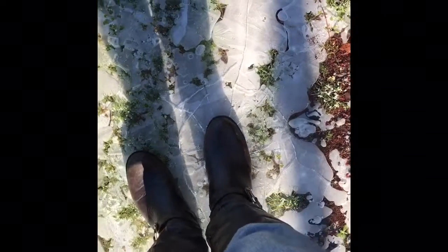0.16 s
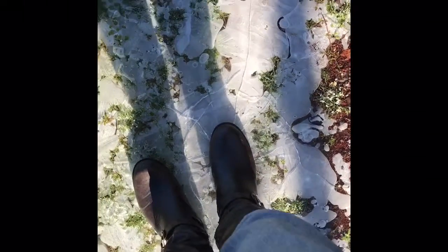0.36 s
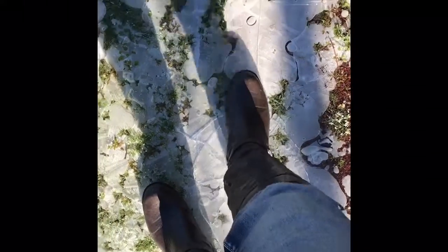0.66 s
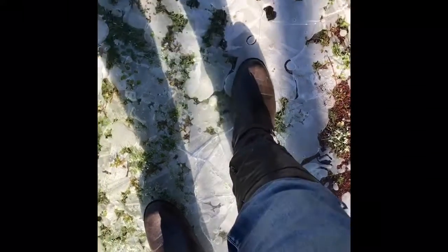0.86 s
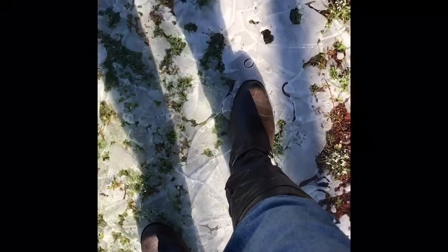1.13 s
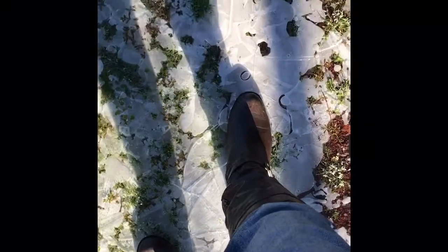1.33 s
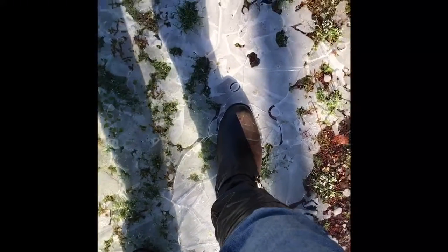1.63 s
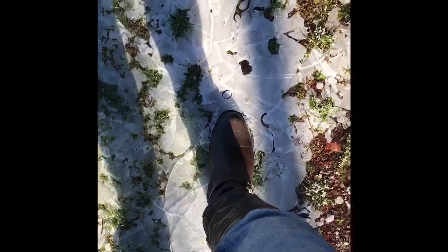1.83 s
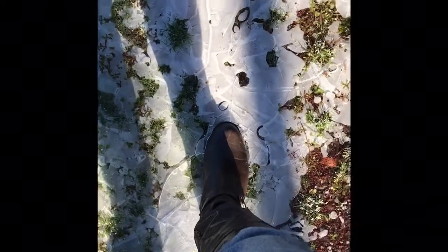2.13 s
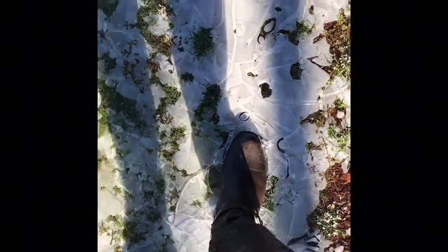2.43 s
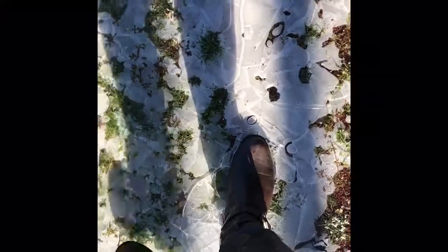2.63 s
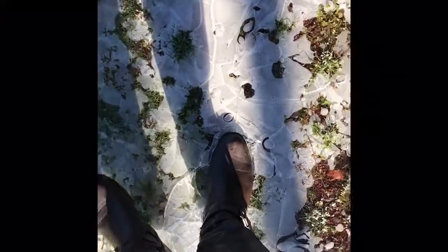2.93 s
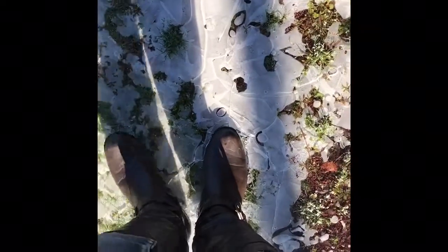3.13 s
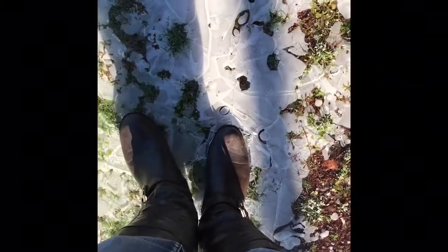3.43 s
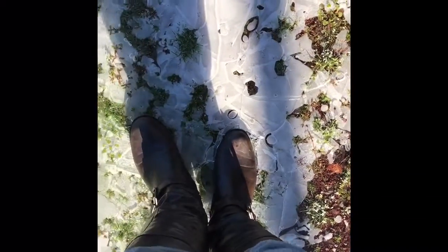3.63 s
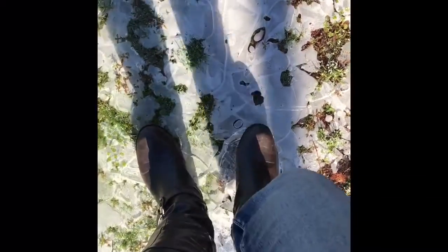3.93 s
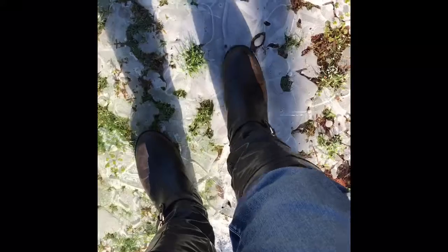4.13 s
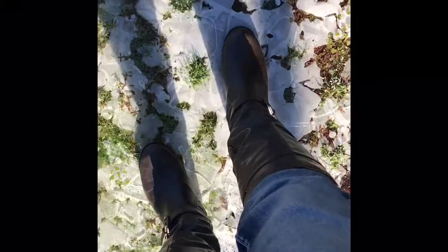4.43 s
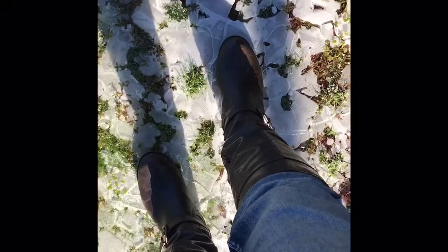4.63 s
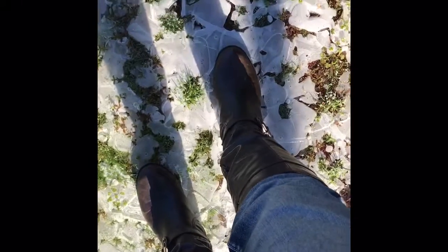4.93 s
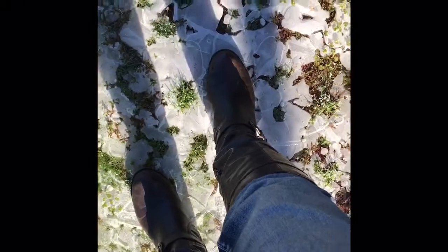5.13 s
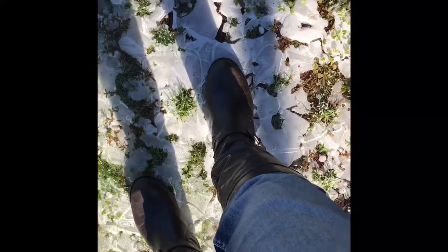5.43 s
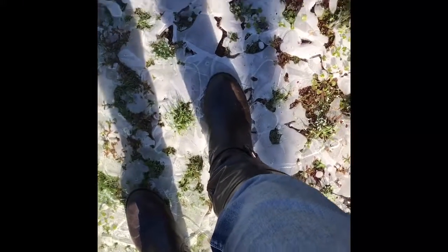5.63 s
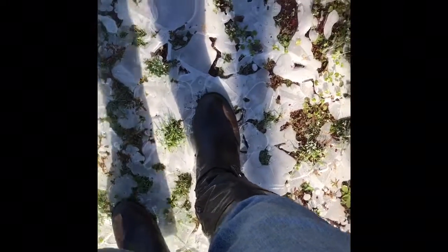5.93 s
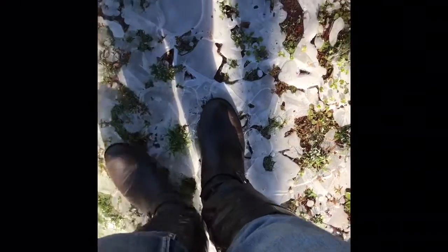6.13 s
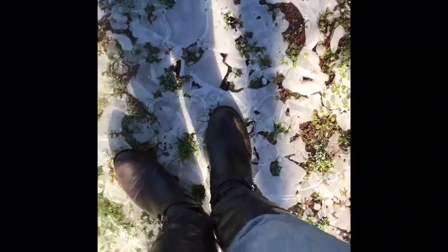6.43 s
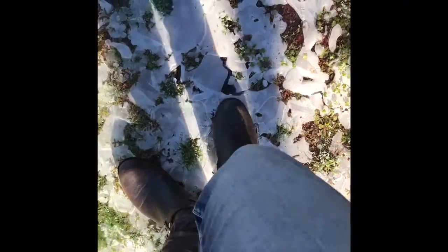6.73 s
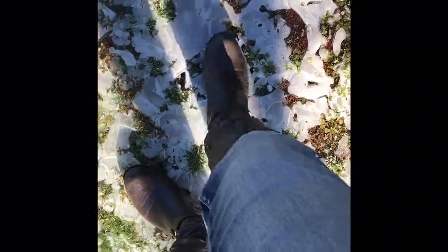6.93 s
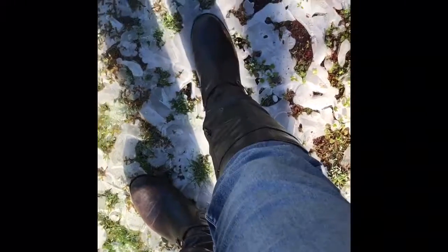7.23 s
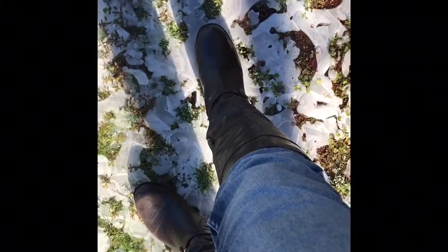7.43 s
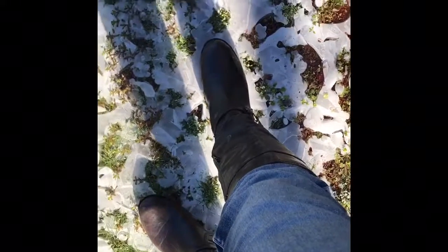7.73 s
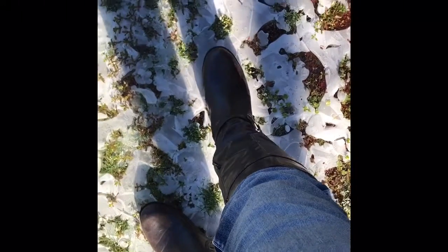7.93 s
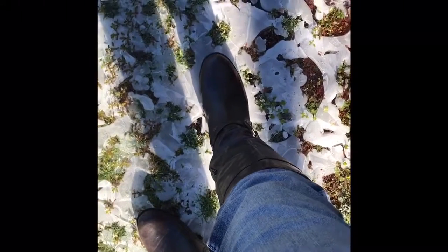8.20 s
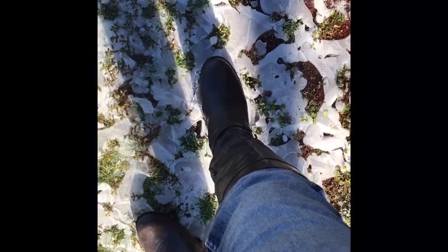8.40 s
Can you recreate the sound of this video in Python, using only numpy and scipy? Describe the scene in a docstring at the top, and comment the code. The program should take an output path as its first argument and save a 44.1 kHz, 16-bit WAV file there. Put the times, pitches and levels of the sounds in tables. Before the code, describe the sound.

Close underfoot, thin ice snaps, crackles and crunches under careful boot steps outdoors, pauses, resumes, then ends with creaking rubber and two hard cracks.

```python
"""A faint low rumble and a thin hiss hang in the open air throughout, made of shaped noise.
Rubber boots soon press on thin ice, hollow over frozen grass, close below the microphone: damped plate
modes snap singly and in short runs, tiny pings crunch and scuff, and trouser cloth brushes early on.
After a lull without cracks the ice snaps again, while trains of tiny jerks make the rubber creak.
Later come more creaks and a cluster of gliding squeaks, then two strong cracks close to the end."""
import sys
import numpy as np
from scipy import signal
from scipy.fft import rfft, irfft, next_fast_len
from scipy.io import wavfile
from scipy.ndimage import uniform_filter1d, map_coordinates

SR = 44100
rng = np.random.default_rng(int(sys.argv[2]) if len(sys.argv) > 2 else 0)


def wav_out(sig):
    """Save sig, one row per channel (or a flat mono array), as 16-bit PCM at SR to the path in sys.argv[1]."""
    wavfile.write(sys.argv[1], SR, np.round(np.clip(np.atleast_2d(sig).T, -1, 1) * 32767).astype(np.int16))


N = 377496  # samples
TOP_HZ = 16000  # nothing is heard above this

# Spectra of the far rumble and of the hiss in the air: (frequency [Hz], relative level [dB])
RUMBLE_SPECTRUM = [(20, -11), (35, -16.5), (55, 2), (85, 0), (190, -9), (280, -14.5), (500, -29),
                   (1100, -55.5)]
HISS_SPECTRUM = [(200, -43.5), (500, 15), (3000, -13), (8000, -4), (16000, -13.5)]

# Spectrum of brushing trouser cloth: (frequency [Hz], relative level [dB])
CLOTH_SPECTRUM = [(60, -27), (180, 10.5), (350, 4.5), (800, -7), (2000, -27), (6000, -68)]
# The trouser leg swings forward once
SWING_S, SWING_RISE_S, SWING_FALL_S, CLOTH_DB = 0.724, 0.35, 0.16, -40

# Rubber creaks as the boot flexes: (time [s], length [s], level [dB])
CREAKS = [(4.033, 0.067, -46.5), (4.077, 0.17, -55.5), (7.268, 0.035, -45.5), (7.319, 0.024, -36.5),
          (7.343, 0.076, -36.5), (7.532, 0.071, -41), (7.849, 0.078, -36), (7.992, 0.11, -41),
          (8.155, 0.019, -43.5)]
# Shaping of the creaks: (frequency [Hz], relative gain [dB])
CREAK_SHAPING = [(400, -20), (1100, -16.5), (1700, -4), (2700, -6), (4000, -8), (7000, -1), (14000, 0)]

# Rubber sticks and slips on ice: (time [s], length [s], start pitch [Hz], end pitch [Hz], level [dB])
SQUEAKS = [(7.562, 0.04, 964, 1140, -47.5), (7.577, 0.031, 1970, 2180, -44),
           (7.613, 0.043, 3140, 3580, -39), (7.656, 0.039, 3160, 4130, -37),
           (7.747, 0.048, 2870, 2800, -40.5), (7.781, 0.017, 1060, 1360, -41)]

# A sole loads or leaves the ice:
# (time of greatest pressure [s], rise [s], release [s], crunch drive [dB], scuff drive [dB])
PRESSES = [(.38, 0.36, 0.42, -36, -44.5), (.57, 0.13, 0.52, -45.5, -41), (0.991, 0.046, 0.2, -34.5, -66),
           (1.21, 0.09, 0.14, -29, -33), (1.85, 0.44, 0.29, -43.5, -44.5), (2.26, 0.35, 0.35, -36.5, -46.5),
           (2.498, 0.16, 0.17, -31, -36.5), (2.848, 0.18, 0.096, -37, -42.5),
           (3.79, 0.19, 0.094, -25.5, -28.5), (4.581, 0.22, 0.26, -26.5, -32.5),
           (4.84, 0.046, 0.21, -39, -36), (5.149, 0.31, 0.084, -40.5, -42), (5.78, 0.35, 0.48, -37, -38),
           (6.53, 0.15, 0.34, -32.5, -33.5), (7.63, 0.11, 0.17, -33, -54.5), (7.77, 0.11, 0.066, -42, -38),
           (8.06, 0.14, 0.035, -41.5, -45.5), (8.47, 0.071, 0.13, -38.5, -37.5)]
SWELL_RANGE_DB = 20  # gained over a rise, lost over a release or fall
REST_CRUNCH_DB, REST_SCUFF_DB = -59, -62  # drive under a standing boot
HALF_SPLINTERING_DB = -66.5  # crunch drive at which splinters reach half their share
# Shaping of crunch and scuff: (frequency [Hz], relative gain [dB])
CRUNCH_SHAPING = [(200, -32.5), (600, -16.5), (1700, -26.5), (3500, -9), (5000, -8), (7500, -4),
                  (16000, 0.5)]
SCUFF_SHAPING = [(120, -31.5), (400, -3.5), (1100, -2), (2600, 3.5), (5000, 7), (12000, -43.5)]

# Cracks of the ice; hollow sheets boom, thin edges click:
# (time [s], relative snap level [dB], hollowness = body over snap [dB], time scale of the run [ms])
CRACKS = [(0.2914, -33, -5.5, 0.36), (0.361, -36.5, -2, 0.94), (0.4064, -33.5, -22, 1.4),
          (0.4158, -19.5, -9.5, 0.83), (0.5266, -24, -5.5, 0.71), (0.7734, -33.5, -10, 1.3),
          (.8615, -22.5, -8, 1.1), (.9583, -30, -21.5, 0.84), (0.9694, -24.5, -15, 1.6),
          (1.0007, -33.5, -13, 1.1), (1.1213, -20.5, -13, 0.58), (1.1399, -16.5, -10, 4.7),
          (1.2027, -20, -16, 1.1), (1.215, -17, 1.5, 2.1), (1.2716, -28, -3.5, 1.3),
          (1.4297, -24.5, -9, 0.69), (1.4387, -24.5, -11, 0.97), (1.6508, -25, -19.5, 0.65),
          (1.7251, -24.5, 2.5, 1.9), (1.7836, -20, -1.5, 3.2), (1.825, -19, 2, 3.2), (1.8329, -22, -7, 5.8),
          (1.9039, -26.5, -15, .6), (1.9271, -21, -16, 1.5), (1.9574, -23.5, -1.5, 1.4),
          (1.9646, -26.5, -10.5, 0.89), (2.092, -33.5, -8, 1.2), (2.1595, -21.5, -15, 0.77),
          (2.1622, -17, -7.5, 1.5), (2.2561, -27, -8, 1.9), (2.331, -24.5, -12.5, 0.65),
          (2.346, -19.5, -9, .8), (2.4176, -31.5, -9.5, 1.3), (2.44, -15, 5.5, 3.3),
          (2.4553, -26.5, 12.5, 3.2), (2.47, -24, 4, 6.6), (2.4973, -30.5, 13, 13), (2.6073, -38, 2, 2),
          (2.7394, -32, -5, 1.1), (3.6956, -31.5, -18, 1), (3.7236, -26.5, -4, 0.89),
          (3.7855, -22.5, 3.5, 1.7), (3.8057, -33, 7, 3.7), (3.8472, -28.5, 6.5, 2), (4.16, -43, -20, .6),
          (4.2851, -35.5, 4, 3.3), (4.3223, -22.5, -2.5, 0.96), (4.3384, -22, -2, 1.5),
          (4.3439, -26.5, 2.5, 0.92), (4.392, -16, -6, 6.2), (4.4126, -23, -4, 1.4), (4.4468, -30, -5, 1.4),
          (4.4693, -25.5, 1, 3.2), (4.5078, -19.5, -8, 1.2), (4.541, -16.5, -9, 3.9),
          (4.5485, -18.5, 0, 3.5), (4.5841, -18.5, -4, 9.1), (4.6004, -22.5, 3.5, 2),
          (4.605, -14.5, -1, 2.4), (4.636, -25, 1.5, 2), (4.8043, -28.5, 10, 1.3), (4.812, -24, 3, 4.9),
          (4.8992, -32, -1.5, 1.9), (4.9222, -23, 1, 4.2), (5.0103, -26.5, -6, 1.3), (5.043, -21, -8, 1.4),
          (5.0571, -29.5, -5.5, 1.7), (5.15, -15.5, 7, 3), (5.5723, -20.5, -11, 0.9),
          (5.7376, -19, 1.5, 1.6), (5.7693, -20, 5.5, 2.4), (5.8081, -31, 7.5, 1.8),
          (5.8175, -17.5, 6.5, 2.2), (5.8873, -26, -4.5, 1.6), (5.917, -23, 3, 4.1),
          (6.0628, -32.5, 5.5, 1.5), (6.507, -26, -8.5, 3.5), (6.562, -28.5, -6.5, 7.9),
          (6.673, -29.5, 5.5, 2.1), (6.787, -28, -14, 0.38), (6.924, -40.5, -17.5, 1),
          (7.0355, -27, -10.5, .7), (7.2308, -28.5, -14, .7), (7.6373, -30.5, -10.5, 4.3),
          (7.676, -31, -6.5, 3.1), (7.7047, -23.5, -6, 2.2), (7.7227, -24.5, -4.5, 2),
          (8.099, -38.5, -7, 1.7), (8.2047, -27.5, -25, 0.34), (8.2246, -31.5, 1, .9),
          (8.2607, -38, -17.5, 1), (8.4434, -14.5, -14, 4.3), (8.451, -13.5, -1.5, 7.1)]
SPLINTER_DB, SPLINTER_LOSS = -0.5, 0.38  # bright edge over the snap [dB]; dB lost per dB of hollowness
PIECE_DB, PIECE_HZ = -27, 861  # relative level and centre pitch of the body of a typical piece
PITCH_HALVES_DB = 120.5  # a larger, louder piece rings lower: rise in body level per octave down


def amp(db):
    """Decibels to gain."""
    return 10 ** (np.asarray(db) / 20)


def unit(x):
    """Scale to rms 1."""
    return x / np.sqrt(np.mean(x ** 2) + 1e-20)


def add(track, s, sound):
    """Mix a sound into the track at time s."""
    start = round(s * SR)
    track[start:start + len(sound)] += sound[:max(N - start, 0)]


def band(x, lo_hz, hi_hz, order=2):
    """Causal band-pass."""
    edges = [lo_hz, min(hi_hz, 0.49 * SR)]
    return signal.sosfilt(signal.butter(order, edges, "band", fs=SR, output="sos"), x)


def coloured(x, points):
    """Shape x by (Hz, dB) points, at rms 1."""
    size = next_fast_len(N + 8192)
    hz, db = np.transpose(points)
    bins_hz = np.fft.rfftfreq(size, 1 / SR)
    gain = amp(np.interp(np.log(bins_hz + 1), np.log(hz), db))
    return unit(irfft(rfft(x, size) * gain, size)[:N])


def noise(points):
    """Noise of rms 1 with the given spectrum."""
    return coloured(rng.standard_normal(N), points)


def wobble(rate):
    """A smooth random curve, rate knots a second."""
    knots = rng.standard_normal(int(N * rate / SR) + 4)
    return map_coordinates(knots, [np.arange(N) * rate / SR])


def swell(s, rise, fall):
    """A gain that grows to 1 at time s and dies away, evenly in dB."""
    t = np.arange(N) / SR - s
    return amp(-SWELL_RANGE_DB * np.maximum(-t / rise, t / fall))


def grains(rate, spread_db, centre_hz, cycles, size=128):
    """Many tiny breaks, rate per second, each a damped ping of random pitch and strength."""
    count = int(rate * N / SR)
    draw = rng.random((count, 3))
    start = (draw[:, :1] * N).astype(int)
    # pitches lie within an octave either side of the centre
    hz = np.minimum(centre_hz * 2 ** (2 * draw[:, 1:2] - 1), SR / 2)
    strength = amp(spread_db * draw[:, 2:] ** 2)  # a positive spread gives many weak, few strong
    turns = hz * np.arange(size) / SR
    pings = strength * np.sin(2 * np.pi * turns) * np.exp(-turns / cycles)
    places = start + np.arange(size)
    return np.bincount(places.ravel(), pings.ravel(), N)[:N]


def fracture(t, run_ms, count=20):
    """A first break, then breaks that tend to shrink as the crack runs on through the sheet."""
    progress = rng.uniform(0, 2.2, count)  # in units of run_ms
    strength = 0.65 * run_ms / (run_ms + 2.8)  # longer runs carry stronger later breaks
    sizes = strength * rng.standard_normal(count) * np.exp(-progress / 2)
    places = (progress * run_ms / 1000 * SR).astype(int)
    breaks = np.bincount(places, sizes, len(t))[:len(t)]
    breaks[0] += 1
    # neighbouring plates and the boot scatter the wave for a few milliseconds
    scatter = 0.033 * rng.standard_normal(len(t)) * amp(-60 * t / 0.037)
    return breaks + scatter


def background():
    """A low distant rumble, slowly uneven in level, under a thin steady hiss."""
    rumble = amp(-50.5 + 3.0 * wobble(2.457)) * noise(RUMBLE_SPECTRUM)
    hiss = amp(-67.5) * noise(HISS_SPECTRUM)
    return rumble + hiss


def cloth():
    """The trouser leg brushes softly: one swell of dull noise in uneven puffs."""
    puffs = amp(CLOTH_DB + 0.83 * wobble(33.5))
    return swell(SWING_S, SWING_RISE_S, SWING_FALL_S) * puffs * noise(CLOTH_SPECTRUM)


def creaks():
    """Flexing rubber slips in a quick, uneven train of tiny jerks."""
    gain = np.zeros(N)
    for s, length, db in CREAKS:
        add(gain, s, amp(db) * np.sqrt(np.hanning(int(length * SR))))
    jerks = grains(rate=1800, spread_db=-4, centre_hz=2730, cycles=0.46)
    return gain * coloured(jerks, CREAK_SHAPING)


def squeaks():
    """Stick and slip of the sole: a short rough glide with weak overtones."""
    out = np.zeros(N)
    for s, length, start_hz, end_hz, db in SQUEAKS:
        u = np.linspace(0, 1, int(length * SR))
        jitter = unit(uniform_filter1d(rng.standard_normal(len(u)), size=60))
        hz = (start_hz + (end_hz - start_hz) * u) * (1 + 0.025 * jitter)
        phase = 2 * np.pi * np.cumsum(hz) / SR
        tone = np.zeros(len(u))
        for k in range(4):
            tone += amp(-k * start_hz / 280) * np.sin((k + 1) * phase)  # rubber damps high overtones
        add(out, s, amp(db) * unit(tone * np.sin(np.pi * u)))
    return out


def pressure():
    """Drive of crunch and scuff: every press swells and fades over the standing weight."""
    crunch, scuff = amp(REST_CRUNCH_DB), amp(REST_SCUFF_DB)
    for s, rise, release, crunch_db, scuff_db in PRESSES:
        load = swell(s, rise, release)
        crunch = np.hypot(crunch, amp(crunch_db) * load)
        scuff = np.hypot(scuff, amp(scuff_db) * load)
    return crunch, scuff


def shifting(x, depth_db):
    """Short-lived resonances come and go as the contact patch moves."""
    z = signal.stft(x, nperseg=512)[2]
    field = uniform_filter1d(rng.standard_normal(z.shape), size=5, axis=0)  # across frequency
    field = uniform_filter1d(field, size=8, axis=1)  # across time
    return unit(signal.istft(z * amp(depth_db * unit(field)), nperseg=512)[1][:N])


def tread():
    """Frozen blades crumble and splinters tick under the sole while the rubber scuffs across the ice."""
    crunch_gain, scuff_gain = pressure()
    blades = grains(rate=3500, spread_db=11.5, centre_hz=6350, cycles=1.0)
    crunch = coloured(blades, CRUNCH_SHAPING)

    splinters = grains(rate=55, spread_db=14, centre_hz=5500, cycles=0.6)
    run = fracture(np.arange(SR // 50) / SR, run_ms=1.5)  # every splinter breaks in the same tiny run
    ticks = coloured(signal.fftconvolve(splinters, run)[:N], CRUNCH_SHAPING)
    loaded = crunch_gain / (crunch_gain + amp(HALF_SPLINTERING_DB))  # a resting sole breaks off fewer
    crumbling = crunch_gain * amp(1.9 * wobble(40)) * (0.65 * crunch + 1.03 * loaded * ticks)

    rub = coloured(grains(rate=2500, spread_db=17.5, centre_hz=1840, cycles=1.0), SCUFF_SHAPING)
    scuff = shifting(rub, depth_db=1.8)
    return crumbling + scuff_gain * amp(4.6 * wobble(27)) * scuff


def sheet(t, centre_hz, octaves, t60, lag, uneven_db, count=24):
    """A piece of ice rings in damped bending modes around a centre; t60 and lag (s) hold at 1 kHz."""
    place = 2 * ((np.arange(count) + rng.random(count)) / count)[:, None] - 1  # -1 to 1 across the modes
    hz = np.minimum(centre_hz * 2 ** (octaves * place), SR / 2)
    khz = hz / 1000
    age = np.maximum(t - lag / np.sqrt(khz), 0)  # low bending waves travel slower and arrive later
    sign = rng.choice([-1, 1], (count, 1))
    level_db = uneven_db * rng.standard_normal((count, 1)) - 6.8 * place ** 2  # weaker away from the centre
    size = sign * amp(level_db) * khz ** 0.49
    decay = amp(-60 * age * khz ** 0.18 / t60)
    ring = np.sum(size * np.sin(2 * np.pi * hz * age) * decay, axis=0)
    return band(ring, 0.3 * centre_hz, TOP_HZ)  # a thin plate radiates no deep bass


def cracks():
    """Each fracture drives a new piece of ice: hollow body, mid snap and bright splinter."""
    out = np.zeros(N)
    t = np.arange(SR // 25) / SR
    for s, snap_db, hollow_db, run_ms in CRACKS:
        body_db = snap_db + hollow_db
        splinter_db = snap_db + SPLINTER_DB - SPLINTER_LOSS * hollow_db
        body_hz = PIECE_HZ * 2 ** ((PIECE_DB - body_db) / PITCH_HALVES_DB)
        body_octaves = np.clip(1.343 * (700 / body_hz) ** 0.52, 0.3, 2)
        breaks = fracture(t, run_ms)
        body = sheet(t, body_hz, body_octaves, t60=0.017, lag=0.00062, uneven_db=1.0)
        snap = sheet(t, centre_hz=2703, octaves=1.24, t60=0.0069, lag=0.00039, uneven_db=1.5)
        splinter = sheet(t, centre_hz=8730, octaves=1.16, t60=0.0016, lag=0.00053, uneven_db=0.5)
        for db, modes in [(body_db, body), (snap_db, snap), (splinter_db, splinter)]:
            sound = unit(signal.fftconvolve(breaks, modes)[:len(t)])
            add(out, s - 0.0002, amp(db - 7.0) * sound)  # 7 dB down: common trim of all three parts
    return out


def outdoors(x, wet_db, t60):
    """Ground and plants scatter back a weak, short tail."""
    t = np.arange(SR // 2) / SR
    scatter = band(rng.standard_normal(len(t)), 280, 19500, order=1)
    tail = scatter * amp(-60 * t / t60) * (1 - np.exp(-t / 0.0024))
    return x + amp(wet_db) * signal.fftconvolve(x, tail / np.linalg.norm(tail))[:N]


def scene():
    """Steps on the ice close below the microphone, in the open air; one channel."""
    ice = outdoors(cracks(), wet_db=-17.5, t60=0.12)
    boots = tread() + squeaks() + creaks()
    return (background() + cloth() + boots + ice)[None]


def record(dry):
    """The sharpest peaks are rounded off near full scale; nothing passes above the band limit."""
    rounded = dry / (1 + np.abs(dry) ** 6) ** (1 / 6)
    size = next_fast_len(N + 8192)
    passed = np.fft.rfftfreq(size, 1 / SR) < TOP_HZ
    return irfft(rfft(rounded, size) * passed, size)[..., :N]


dry = scene()
out = record(dry)
wav_out(out)
```